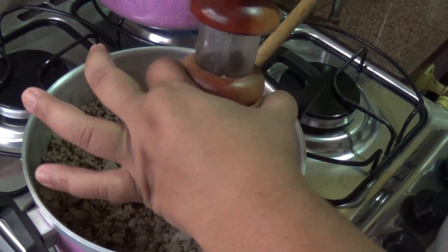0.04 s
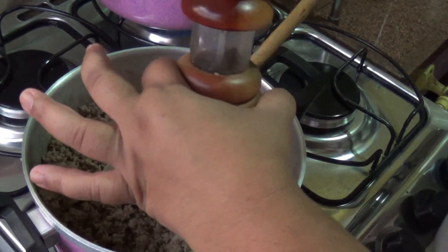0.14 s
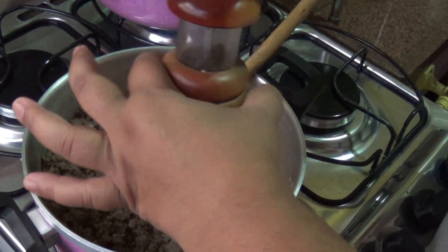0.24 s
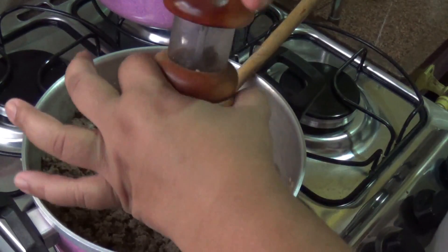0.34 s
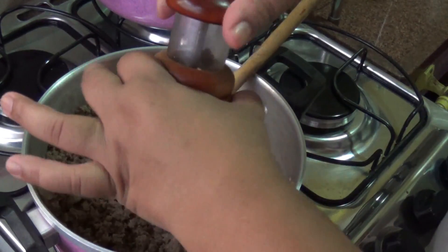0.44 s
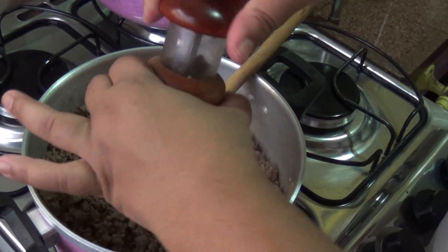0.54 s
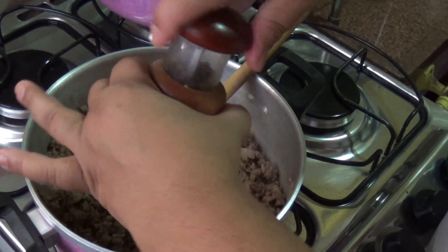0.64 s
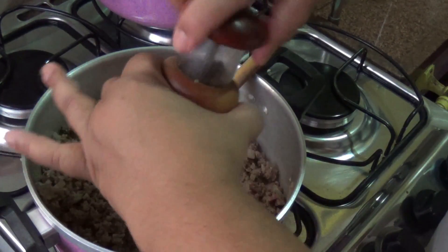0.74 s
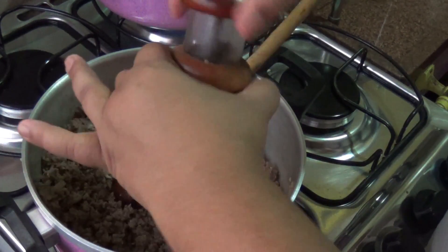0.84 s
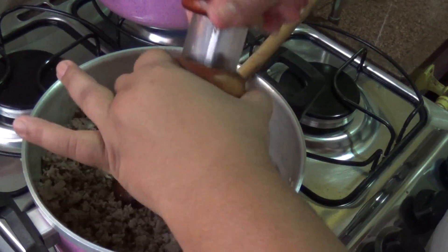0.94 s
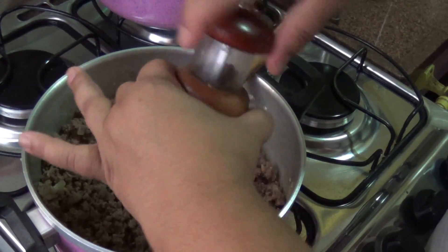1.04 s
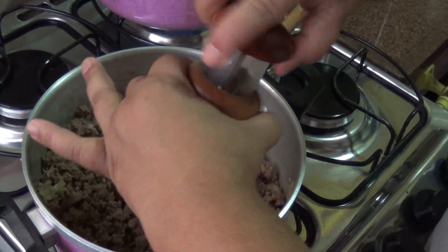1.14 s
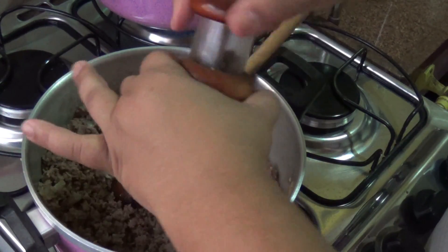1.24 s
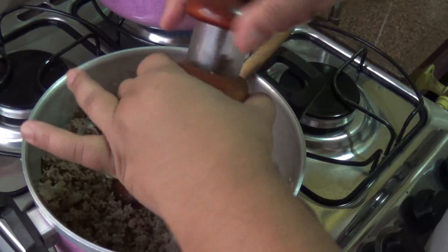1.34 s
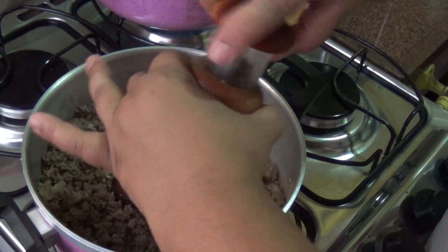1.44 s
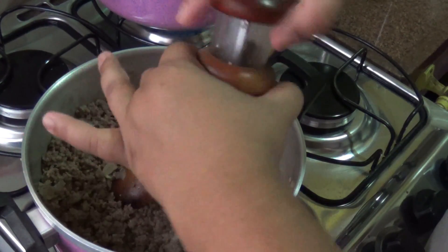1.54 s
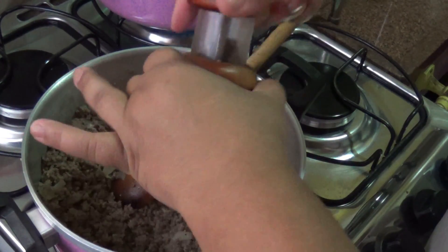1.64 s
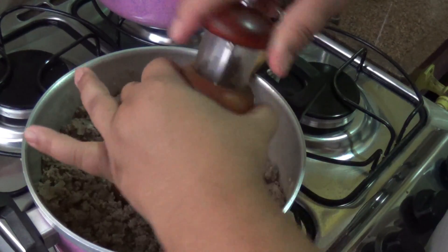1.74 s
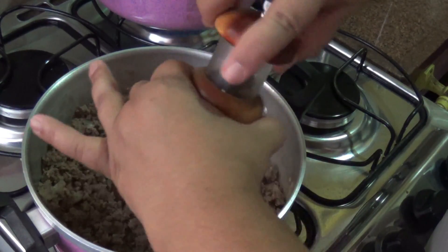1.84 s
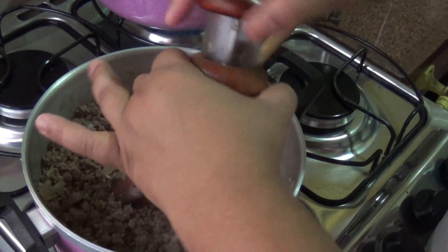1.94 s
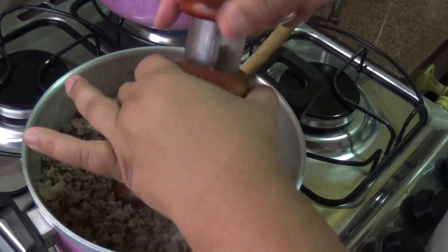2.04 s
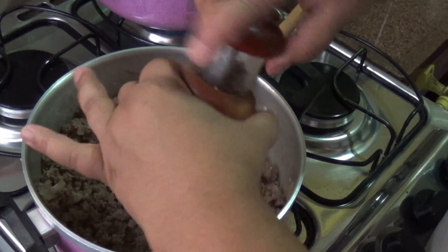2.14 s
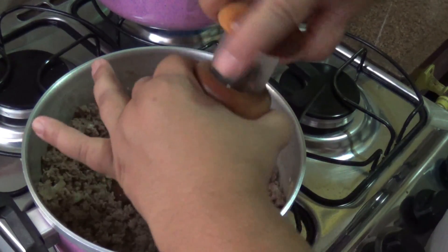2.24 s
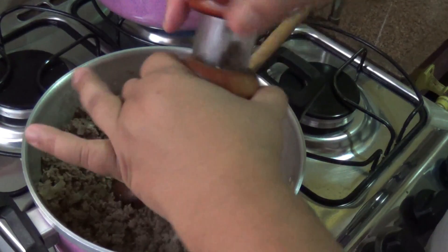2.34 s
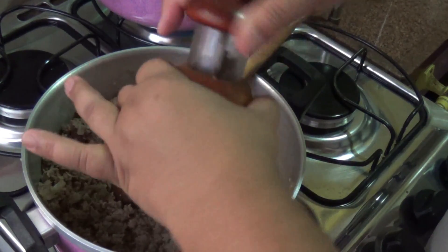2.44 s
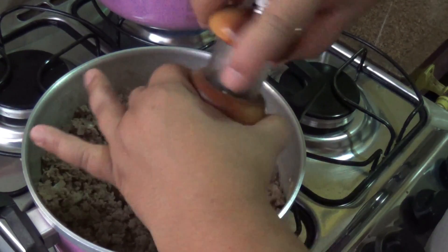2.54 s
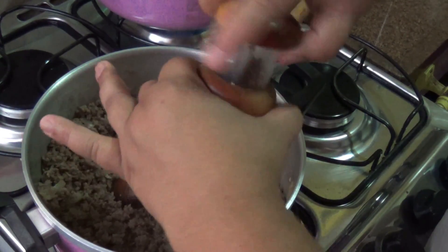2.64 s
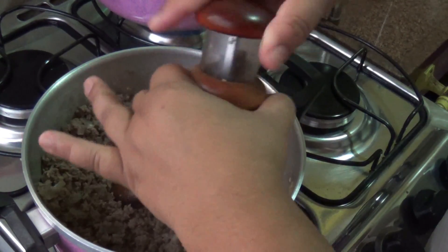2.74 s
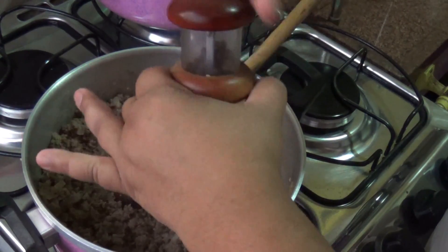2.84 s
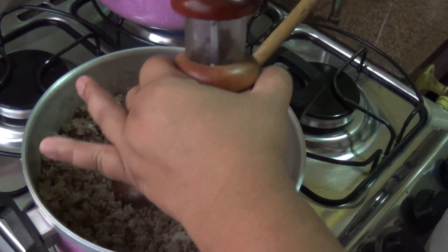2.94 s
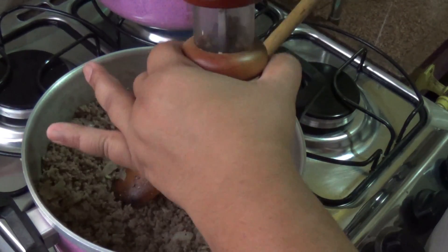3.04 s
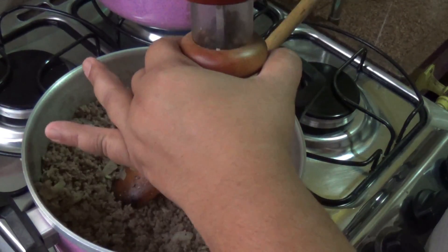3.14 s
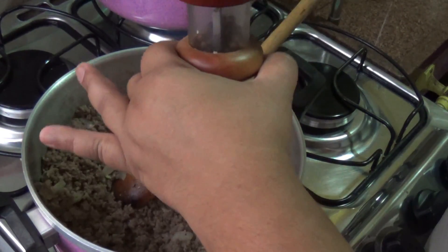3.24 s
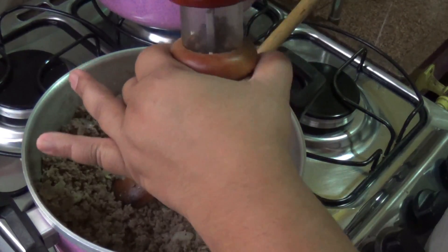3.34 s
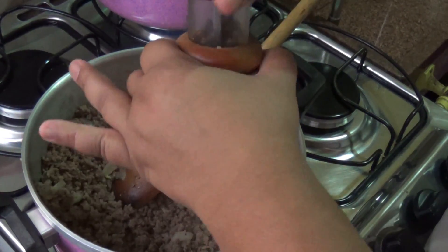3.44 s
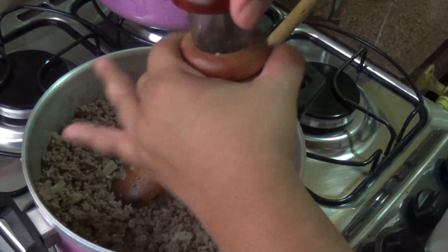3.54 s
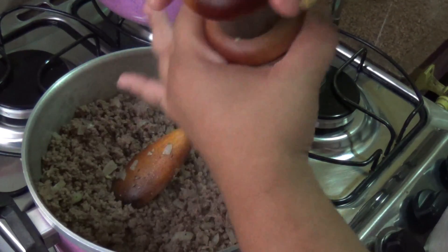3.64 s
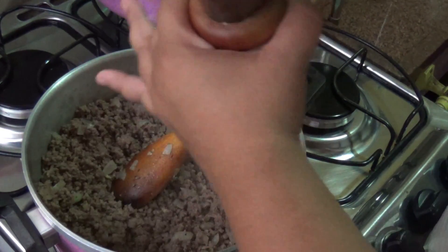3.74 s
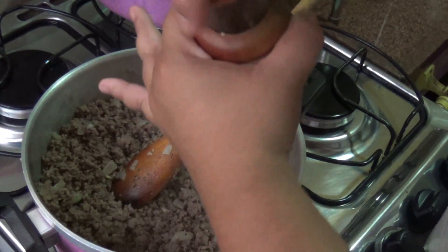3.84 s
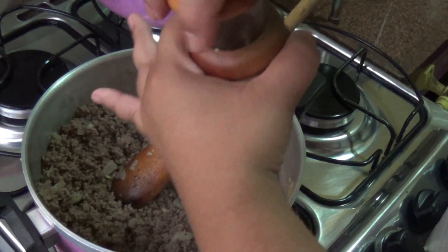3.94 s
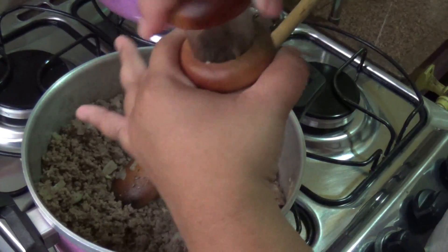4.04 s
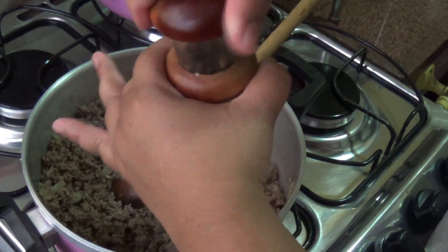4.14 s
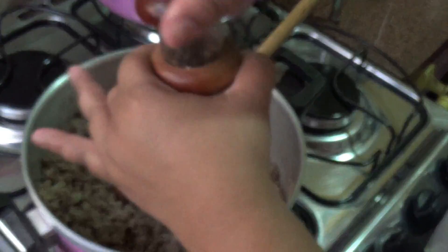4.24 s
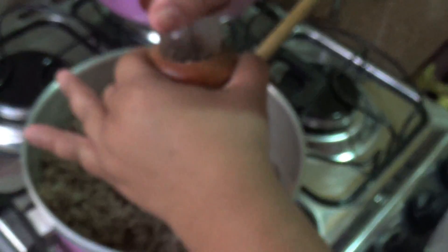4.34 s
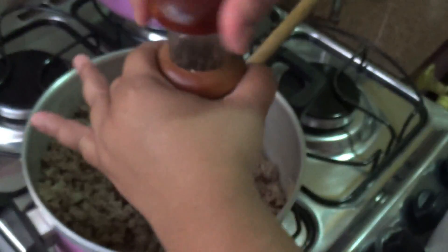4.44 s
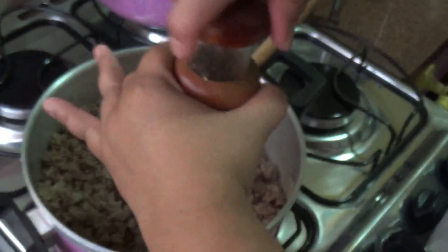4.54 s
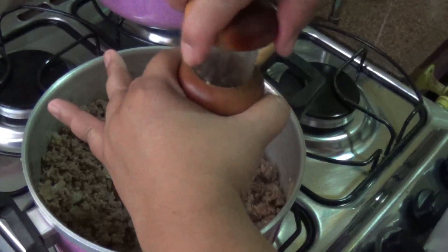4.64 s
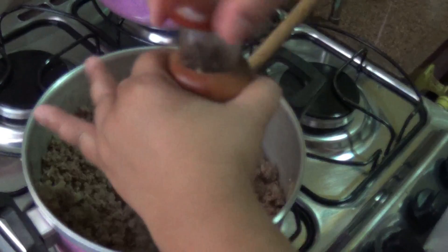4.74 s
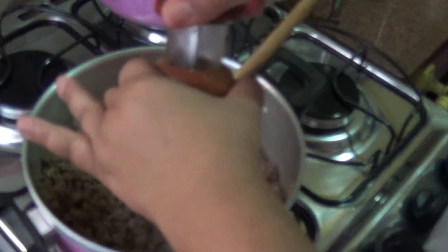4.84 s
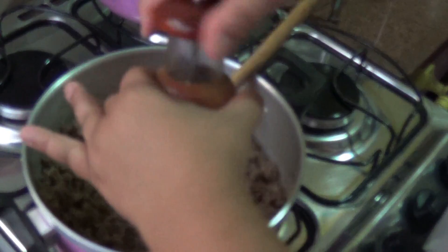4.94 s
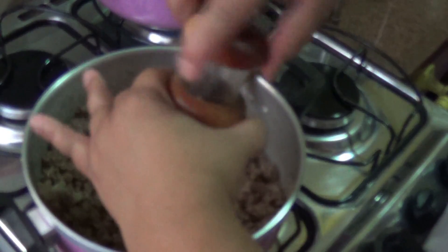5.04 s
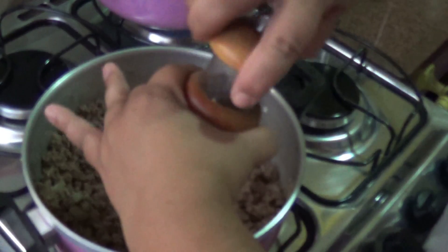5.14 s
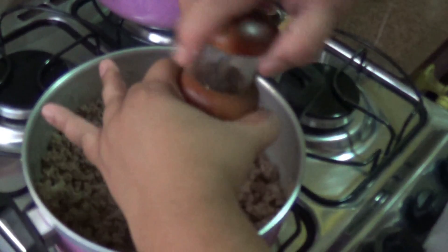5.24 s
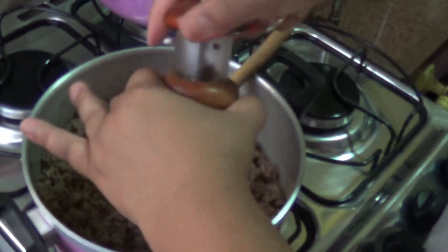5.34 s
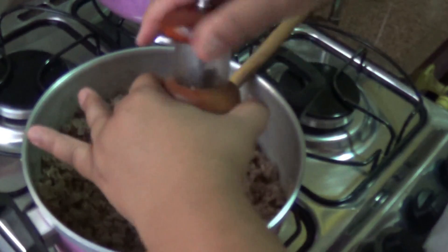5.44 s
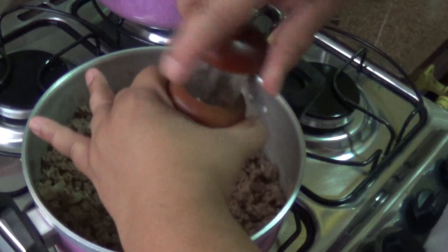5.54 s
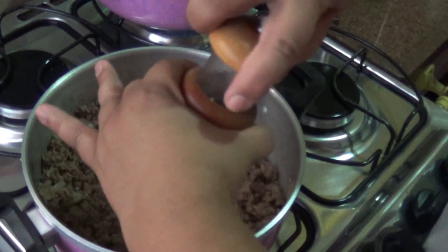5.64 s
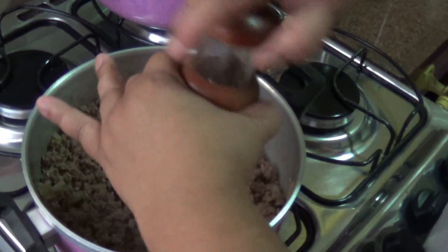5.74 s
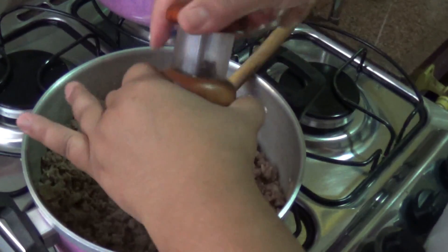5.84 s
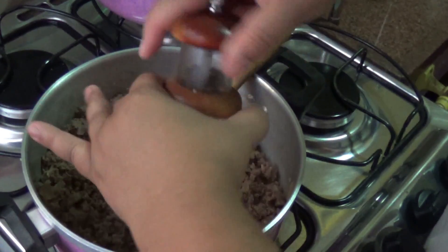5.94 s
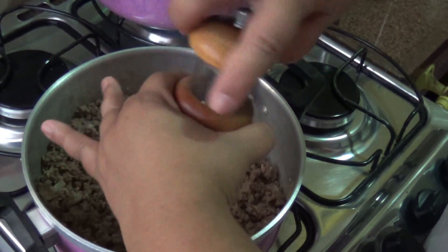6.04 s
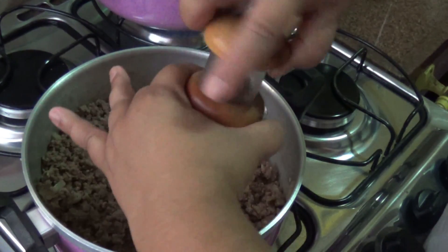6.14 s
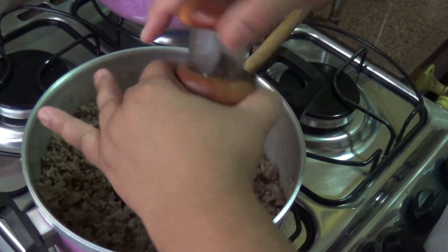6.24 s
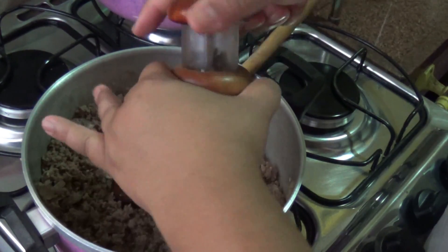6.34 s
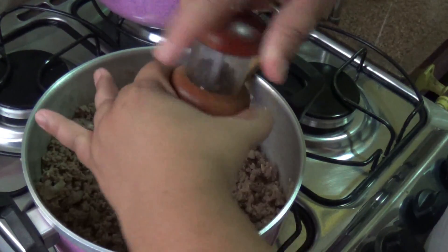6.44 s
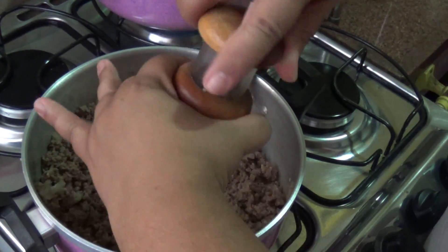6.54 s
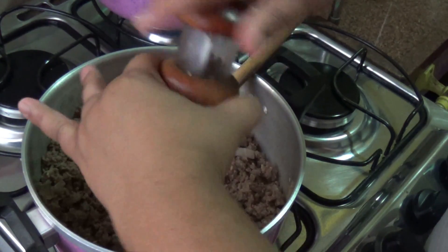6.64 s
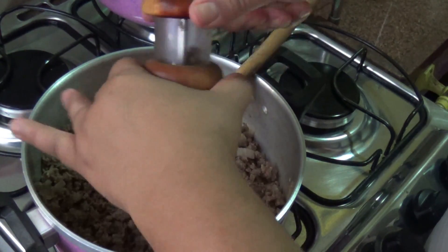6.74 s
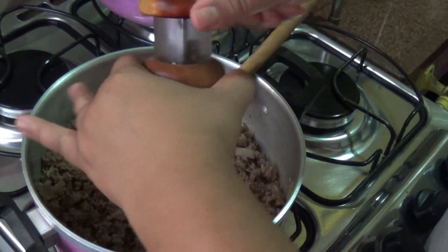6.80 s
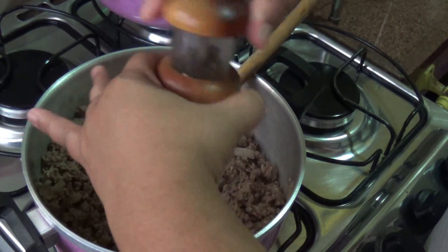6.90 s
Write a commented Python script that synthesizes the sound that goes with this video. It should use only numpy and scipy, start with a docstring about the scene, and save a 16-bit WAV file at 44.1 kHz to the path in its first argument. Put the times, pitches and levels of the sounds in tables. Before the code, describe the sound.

Two bouts of hand-grinding pepper over a pan: brief rasping crunches three or four times a second, sharp double snaps of splitting corns, tiny burr ticks and dull wooden knocks as the loose top turns back. A gap of less than a second separates the bouts. A very soft steady hiss and faint motor hum lie beneath; short reflections from pan and room surround the close, nearly centred mill.

```python
"""Pepper mill over a stove pan

In a small kitchen, close to the microphone, a wooden pepper mill is twisted back and forth in two bouts.
Each twist is a run of cracks and fine grit: short noise bursts shaped by the wrist and the mill's body.
Between twists the loose top knocks and the burr ticks, as single bursts with colours of their own.
Under it the pan hisses faintly (filtered noise with spits) and a motor hums (steady sines).
Noise-like reflections place the mill over the pan and in the room."""
import sys
import numpy as np
from scipy import signal
from scipy.fft import rfft, irfft, next_fast_len
from scipy.io import wavfile

SR = 44100
rng = np.random.default_rng(int(sys.argv[2]) if len(sys.argv) > 2 else 0)


def file_out(sig):
    """Save sig as 16-bit WAV at sys.argv[1]."""
    # one column per channel
    cols = np.atleast_2d(sig).T
    # limit, then scale
    lim = np.clip(cols, -1, 1)
    pcm = np.round(lim * 32767).astype(np.int16)
    wavfile.write(sys.argv[1], SR, pcm)


N = 307377
TIME = np.arange(N) / SR  # s

# Levels of mill events are relative: each layer is scaled again in the mix.
# Colour of the pan's hiss: (frequency [Hz], relative density [dB per Hz])
HISS_COLOUR = [(25,-20),(80,-14.5),(110,-17),(220,-6),(400,-4.5),(700,-8),(1300,-4),(2000,-8.5),(4000,-10.5),(6500,-17.5),(10800,-14.5),(15000,-26)]
# Stove resonances that colour the hiss: (frequency [Hz], width [Hz], level against the plain path [dB])
STOVE_MODES = [(212,12,3.5),(654,82,4.5),(1234,33,-3)]
# Steady tones of a motor and of electronics: (frequency [Hz], rms level [dB])
HUM_TONES = [(59.3,-55),(118.4,-69.5),(15734,-80)]
# Stereo width, as a filter on the side part: (frequency [Hz], gain [dB])
SIDE_GAIN = [(100,-26),(300,-9),(2000,-6.5),(4500,-6),(8000,-4),(13000,-24)]
# Light, hard ticks of the burr: (time [s], level [dB])
TICKS = [(0.09, -13), (0.427, -16.5), (.74, -14), (1.454, -6), (1.49, -4), (1.822, -8), (2.206, -14),
         (2.577, -6), (3.664, -12), (4.017, -8), (4.037, -12), (4.05, -15), (4.154, -11), (4.241, -10),
         (4.288, -12), (4.329, -19), (5.37, -12), (5.862, -9), (6.553, -14), (6.571, -6)]
# Colour of the ticks: (frequency [Hz], relative density [dB per Hz])
TICK_COLOUR = [(500,-10),(2800,-12),(4000,4),(5200,-2),(6500,-6.5),(8300,-3.5),(11500,-1),(16000,-13)]
# Twists of the wrist; in each a corn splits and the burr starts to run:
# (start [s], end [s], soft scrape before the start [s], grinding level at mid-twist [dB],
#  swell from start to end [dB], opening crack level [dB])
TWISTS = [(0.479, 0.67, 0, -35, 7, -14), (.756, 0.854, .03, -22, -6.5, -3.5),
          (0.946, 1.047, 0.0077, -23, -1, -5), (1.118, 1.246, 0.0009, -21, -6.5, -12.5),
          (1.339, 1.415, 0.044, -19, -8.5, -3.5), (1.519, 1.589, 0.049, -19, -8, -3),
          (1.659, 1.785, 0.017, -21, 1, -9.5), (1.851, 1.954, 0.011, -20.5, -1.5, -5.5),
          (2.069, 2.154, .035, -17.5, 1.5, -8), (2.229, 2.33, 0.0086, -18, 5, -11.5),
          (2.42, 2.519, 0.012, -19, 0, -11), (2.609, 2.693, 0.0015, -23, -3.5, -6.5),
          (3.467, 3.57, .02, -34.5, 6, -28), (3.744, 3.832, 0.059, -29, 1, -5),
          (4.011, 4.07, .03, -26, 3, -6), (4.177, 4.298, 0.028, -24.5, -10, -1.5),
          (4.351, 4.557, 0.0088, -23.5, -7.5, -7), (4.644, 4.83, 0.0053, -23, -9, -6.5),
          (4.897, 5.074, .02, -21, 2, -11), (5.183, 5.197, 0.031, -19.5, -5, -12),
          (5.231, 5.315, 0.0034, -20, 2, -1), (5.43, 5.599, .012, -22, -4, -8.5),
          (5.677, 5.818, 0.016, -20.5, 1.5, -11), (5.883, 6.017, 0, -20, -1.5, -5.5),
          (6.14, 6.266, 0.0086, -20.5, -4.5, -4), (6.379, 6.471, .035, -22.5, -2, -15),
          (6.612, 6.652, 0.018, -22, -4.5, -1), (6.843, 6.921, 0.046, -25.5, 1.5, -9.5)]
# Further peppercorns that split loudly: (time [s], level [dB])
LATER_CRACKS = [(.611, -19), (0.647, -13.5), (.958, -11), (.972, -4.5), (0.989, -4), (1.719, -5),
                (2.14, -8), (2.513, -5.5), (2.682, -2.5), (3.415, -19.5), (3.527, -13.5), (3.585, -10),
                (3.956, -10.5), (3.975, -9.5), (4.059, -2.5), (4.123, -5.5), (4.131, -3.5), (4.261, -6.5),
                (4.469, -8.5), (4.619, -7.5), (4.695, -4), (5.741, -7), (5.779, -1.5), (6.114, -8),
                (6.22, -4), (6.895, -9.5)]
# Colour of crushed pepper: (frequency [Hz], relative density [dB per Hz])
GRIND_COLOUR = [(120,-42),(250,-19.5),(450,-13.5),(800,-0.5),(1300,-4),(2100,1),(3000,-1.5),(4100,-0.5),(5400,-4),(6500,-13.5),(8000,-7.5),(11000,-12),(13500,-19),(16000,-39)]
# The wooden top takes up its play as the turn reverses: (time [s], level [dB])
KNOCKS = [(1.294, -4.5), (1.652, -6.5), (2.012, -13), (2.054, -14.5), (2.384, -4.5), (3.464, -17),
          (3.92, -9), (4.866, -9), (6.318, -6), (6.352, -15), (6.776, -20.5)]
# Colour of the knocks: (frequency [Hz], relative density [dB per Hz])
KNOCK_COLOUR = [(120,-60),(400,-22),(900,-9),(1700,-2),(2600,0),(3900,-7),(6000,-21),(15000,-40)]
# Resonances of the mill and the pan under it: (frequency [Hz], width [Hz], level against the plain path [dB])
BODY_MODES = [(887,87,-4),(1820,200,-14),(2677,220,-4),(3490,220,-8.5),(3830,450,-8.5),(7900,1350,-3),(10680,810,2.5)]

ARCH_DB = 3  # the middle of a twist above its ends
SCRAPE_DB = -6.5  # the soft scrape, against the start of its twist
RELEASE_DB_PER_S = 507
# Colour slopes in dB per octave: the sound dulls as corns turn to crumbs; a whole corn splits brighter
START_TILT_DB, DULLING_DB, CRACK_TILT_DB = 0.31, 1.17, 2
SECOND_SNAP_S, SECOND_SNAP_DB = 0.00592, -5  # mean wait, and level against the first snap


def from_db(db):
    """Decibels to gain."""
    return 10 ** (np.asarray(db) / 20)


def rms_one(x):
    """Scale to rms 1."""
    return x / np.sqrt(np.mean(x ** 2) + 1e-20)


def coloured(x, points, keep_power=True):
    """Causal (minimum-phase) filter that follows a (frequency [Hz], level [dB]) table."""
    size = 2 * next_fast_len(N // 2 + SR // 10)
    hz, db = np.transpose(points)
    bins_hz = np.fft.rfftfreq(size, 1 / SR)
    gain = from_db(np.interp(np.log(bins_hz + 1), np.log(hz), db))
    if keep_power:
        gain = rms_one(gain)
    # folding the cepstrum onto positive time gives the minimum phase
    cepstrum = irfft(np.log(gain))
    cepstrum[1:size // 2] *= 2
    cepstrum[size // 2 + 1:] = 0
    response = np.exp(rfft(cepstrum))
    return irfft(rfft(x, size) * response)[..., :N]


def resonant(x, modes):
    """The plain sound plus the ringing of each resonance it drives."""
    out = x
    for hz, width_hz, db in modes:
        b, a = signal.iirpeak(hz, hz / width_hz, fs=SR)
        out = out + from_db(db) * signal.lfilter(b, a, x)
    return out


def stereo(mid, side):
    """Left and right from a middle and a narrower side part."""
    return mid + coloured(side, SIDE_GAIN, keep_power=False) * np.array([[1], [-1]])


def pan_hiss():
    """Steady noise of the hot pan with sparse random spits, coloured by the stove's resonances."""
    spits = (rng.random(N) < 600 / SR) * rng.standard_normal(N)  # about 600 a second
    highpass = signal.butter(1, 4000, "high", fs=SR, output="sos")
    sizzle = from_db(13) * signal.sosfilt(highpass, spits)
    mid, side = rng.standard_normal((2, N))
    noise = stereo(mid + sizzle, from_db(-4.5) * side)
    return from_db(-43) * resonant(coloured(noise, HISS_COLOUR), STOVE_MODES)


def hum():
    """Steady sines of a motor and of electronics, each from a random phase."""
    out = np.zeros(N)
    for hz, rms_db in HUM_TONES:
        tone = np.sin(2 * np.pi * (hz * TIME + rng.random()))
        out += np.sqrt(2) * from_db(rms_db) * tone
    return out


def snaps(times, sizes, tilt_db, decay_s, vary_db):
    """Each fracture is a burst that dies in milliseconds, sooner in the treble, with a colour of its own."""
    at = np.clip((np.asarray(times) * SR).astype(int), 0, N - 1)
    edges_hz = np.array([150, 1000, 1700, 2500, 3500, 4800, 6800, 10000, 17000])
    centres_hz = np.sqrt(edges_hz[1:] * edges_hz[:-1])
    slope_db = np.outer(tilt_db, np.log2(centres_hz / 3000))
    own_colour_db = vary_db * rng.standard_normal((len(at), len(centres_hz)))
    band_power = from_db(slope_db + own_colour_db) ** 2
    band_power /= np.mean(band_power, axis=1, keepdims=True)
    energies = sizes[:, None] ** 2 * band_power
    opening = np.exp(-1 / (0.00058 * SR))  # a crack takes a moment (0.58 ms) to run
    out = np.zeros(N)
    # in each band the burst is a rough vibration under the decaying energy of all cracks so far
    for k, hz in enumerate(centres_hz):
        life_s = decay_s * (hz / 4000) ** -.55
        impulses = np.bincount(at, energies[:, k], N) + 1e-18
        energy = signal.lfilter([1 - opening], [1, -opening], impulses)
        decaying = signal.lfilter([decay_s / life_s], [1, -np.exp(-2 / (life_s * SR))], energy)
        rough = np.sign(rng.random(N) - .5)
        band = signal.butter(2, edges_hz[k:k + 2], "band", fs=SR, output="sos")
        out += signal.sosfilt(band, np.sqrt(decaying) * rough)
    return out


def blows(table, colour, decay_s, vary_db, tilt_db=0):
    """Single contacts from a (time [s], level [dB]) table, each a short burst in the given colour."""
    times, db = np.transpose(table)
    tilts_db = np.full(len(times), tilt_db)
    return coloured(snaps(times, from_db(db), tilts_db, decay_s, vary_db), colour)


def burr_ticks():
    """Hard, light contacts of the burr that die within about a millisecond."""
    return from_db(-9.0) * blows(TICKS, TICK_COLOUR, decay_s=0.00092, vary_db=1.5)


def wrist(times):
    """Effort and brightness at given moments: a twist takes hold, arches, dulls and lets go."""
    effort, tilt_db = np.zeros((2, len(times)))
    for start, end, scrape_s, level_db, swell_db, _ in TWISTS:
        progress = np.clip((times - start) / max(end - start, .01), 0, 1)
        db = level_db + swell_db * (progress - .5)
        db -= ARCH_DB * (2 * progress - 1) ** 2
        db += SCRAPE_DB * (times < start)
        db -= RELEASE_DB_PER_S * np.maximum(times - end, 0)
        # from its scrape on, each twist replaces the one before
        begun = times >= start - scrape_s
        effort = np.where(begun, from_db(db), effort)
        tilt_db = np.where(begun, START_TILT_DB - DULLING_DB * progress, tilt_db)
    return effort, tilt_db


def crushing(per_s, spread_db, decay_s, vary_db, follows):
    """An uneven run of fractures; their size goes with the wrist's effort to the power `follows`."""
    draws = rng.random((int(per_s * TIME[-1] * 1.2), 2))
    gaps_s = (.25 + 1.5 * draws[:, 0]) / per_s
    times = np.cumsum(gaps_s)
    effort, tilt_db = wrist(times)
    sizes = rms_one(from_db(spread_db * draws[:, 1])) * effort ** follows
    run = coloured(snaps(times, sizes, tilt_db, decay_s, vary_db), GRIND_COLOUR)
    return run / np.sqrt(per_s * decay_s / 2)  # evens out power for the rate and length of bursts


def bites():
    """Burr teeth bite through corns: distinct fractures, 88 a second on average."""
    return from_db(-5.5) * crushing(per_s=88, spread_db=9.0, decay_s=0.0023, vary_db=4.5, follows=1.0)


def grit():
    """Crumbs rubbed fine: dense, shorter fractures; even a light turn rubs grit."""
    return from_db(-11.0) * crushing(per_s=480, spread_db=8, decay_s=0.0008, vary_db=4, follows=0.97)


def splits():
    """Loud fractures as (time [s], level [dB]): one opens each twist, others come later, each snaps twice."""
    openings = [(start, db) for start, *_, db in TWISTS]
    first = np.array(openings + list(LATER_CRACKS))
    wait_s = SECOND_SNAP_S * (.5 + rng.random(len(first)))
    second = np.column_stack([first[:, 0] + wait_s, first[:, 1] + SECOND_SNAP_DB])
    return np.vstack([first, second])


def corn_cracks():
    """Whole corns split in bright double snaps."""
    return from_db(-9.5) * blows(splits(), GRIND_COLOUR, decay_s=0.002, vary_db=2.0, tilt_db=CRACK_TILT_DB)


def top_knocks():
    """The loose wooden top strikes as it takes up its play: short bursts without much treble."""
    return from_db(-6.0) * blows(KNOCKS, KNOCK_COLOUR, decay_s=0.0012, vary_db=1.5)


def mill():
    """All contacts and fractures ring together in the mill's body."""
    contacts = burr_ticks() + bites() + grit() + corn_cracks() + top_knocks()
    return resonant(contacts, BODY_MODES)


def reflections(x, delay_s, t60, dull_hz, size=2048):
    """Dense reflections that die away; their pattern keeps changing as the hands and the mill move."""
    age_s = np.arange(int(min(t60, 1) * SR)) / SR
    delay = int(delay_s * SR)
    lowpass = signal.butter(1, dull_hz, fs=SR, output="sos")
    dulled = np.pad(signal.sosfilt(lowpass, x), (size, 2 * size))
    dying = from_db(-60 * age_s / t60)
    dying /= np.sqrt(np.sum(dying ** 2))
    fade = signal.windows.cosine(2 * size)
    out = np.zeros((2, N + 3 * SR))
    # overlapping blocks, each with a fresh random pattern
    for i in range(0, N + size, size):
        block = fade * dulled[i:i + 2 * size]
        pattern = dying * rng.standard_normal((2, len(age_s)))
        echo = signal.fftconvolve(block[None], pattern, axes=1)
        out[:, i + delay:i + delay + echo.shape[1]] += echo
    mid, side = out[:, size:size + N]
    return stereo(mid, side)


def scene():
    """The mill close by, thrown back by the pan, then by the kitchen, with a faint lingering tail."""
    background = pan_hiss() + hum()
    direct = mill()
    pan = from_db(-7.5) * reflections(direct, delay_s=.001, t60=0.057, dull_hz=9700)
    kitchen = from_db(-8.5) * reflections(direct, delay_s=.005, t60=0.19, dull_hz=11500, size=4096)
    tail = from_db(-16.5) * reflections(direct, delay_s=.03, t60=0.99, dull_hz=12000, size=16384)
    balance = from_db([[.15], [-.15]])  # the mill sits a touch to the left
    return (direct + pan + kitchen + tail) * balance + background


def record(dry):
    """At the microphone's output the tallest peaks are rounded and the top is cut steeply at 16 kHz."""
    ceiling = .75
    rounded = ceiling * np.tanh(dry / ceiling)
    lowpass = signal.ellip(10, .1, 90, 16000, fs=SR, output="sos")
    return signal.sosfilt(lowpass, rounded)


dry = scene()
out = record(dry)
file_out(out)
```